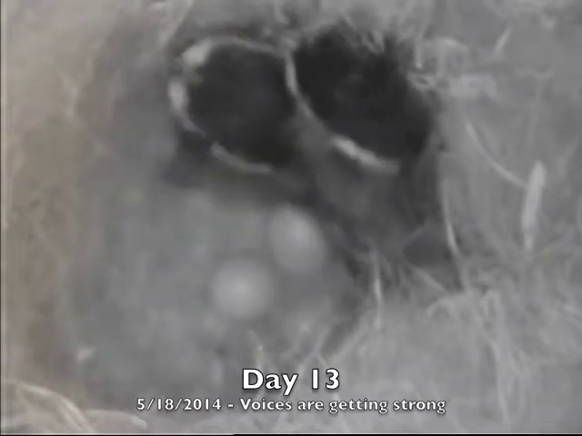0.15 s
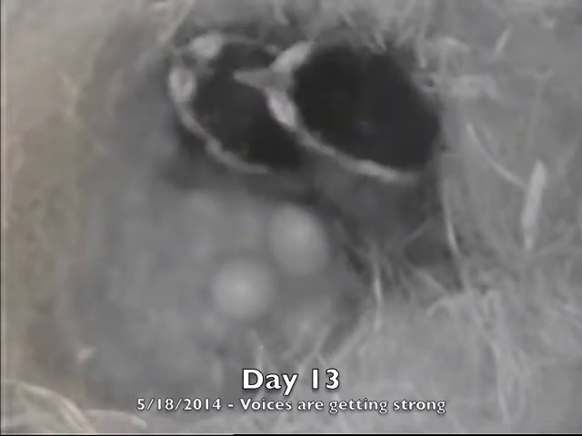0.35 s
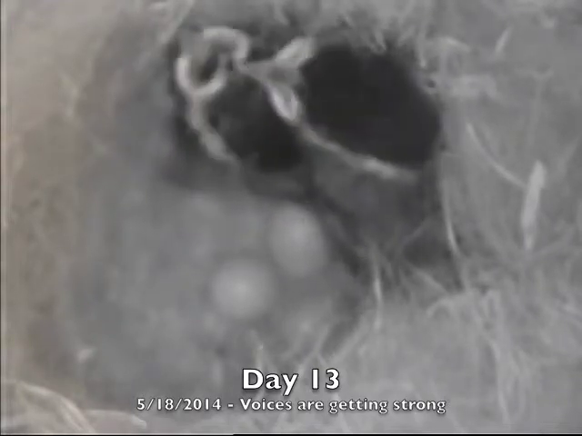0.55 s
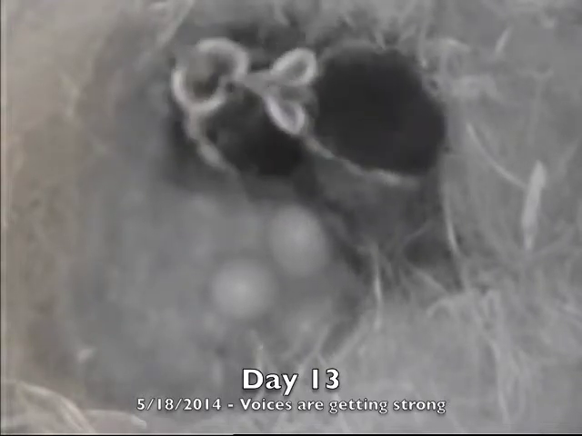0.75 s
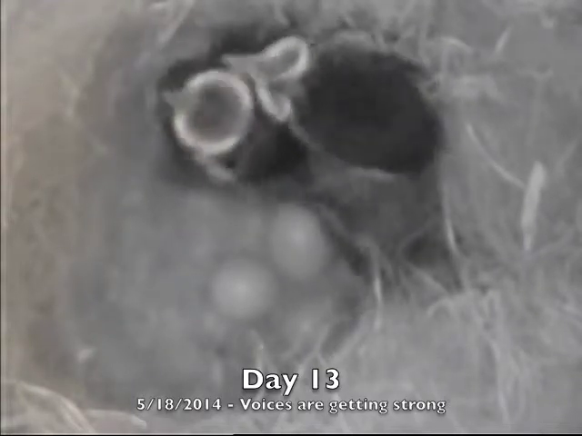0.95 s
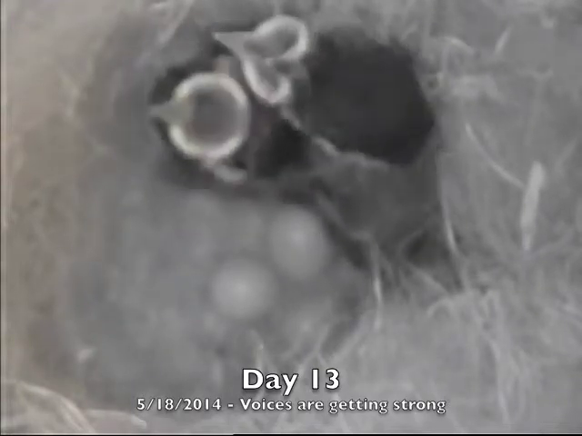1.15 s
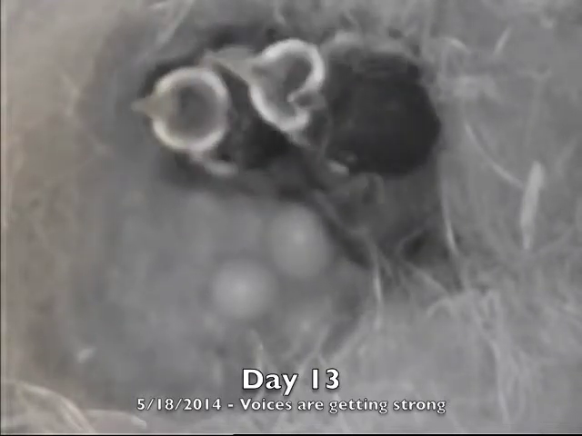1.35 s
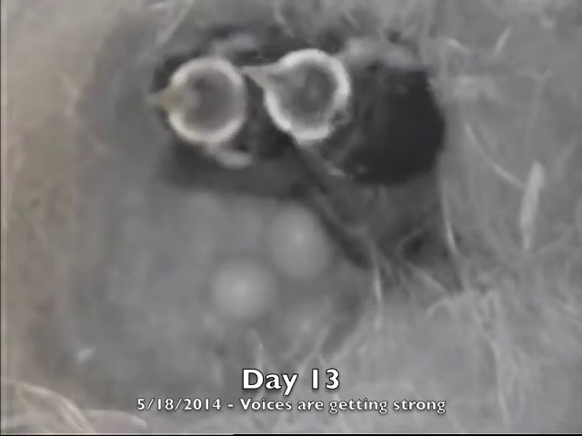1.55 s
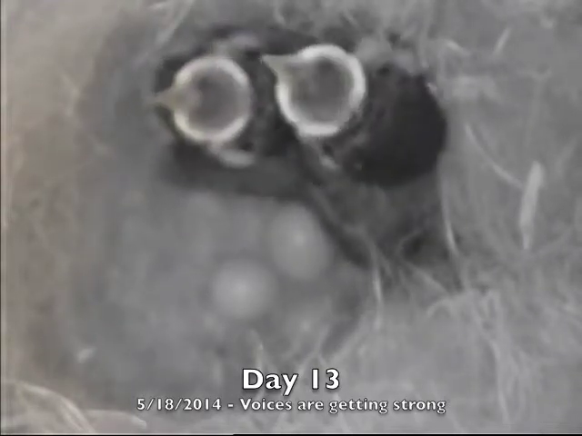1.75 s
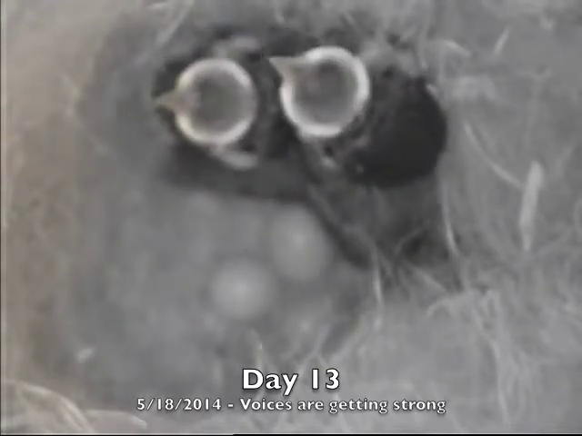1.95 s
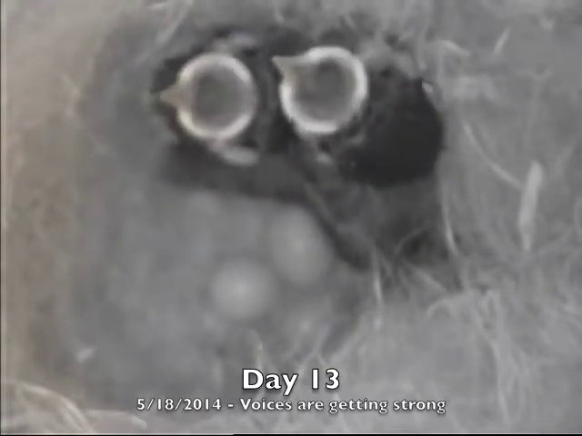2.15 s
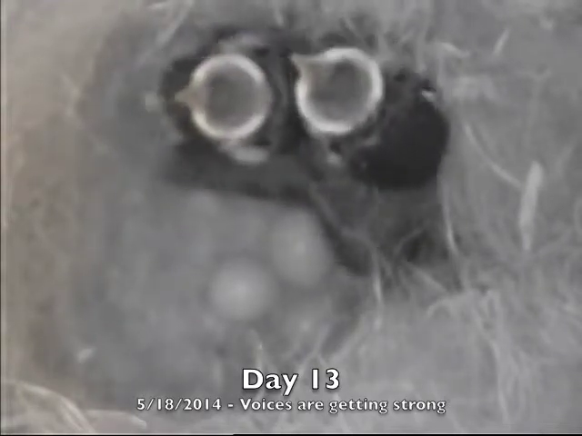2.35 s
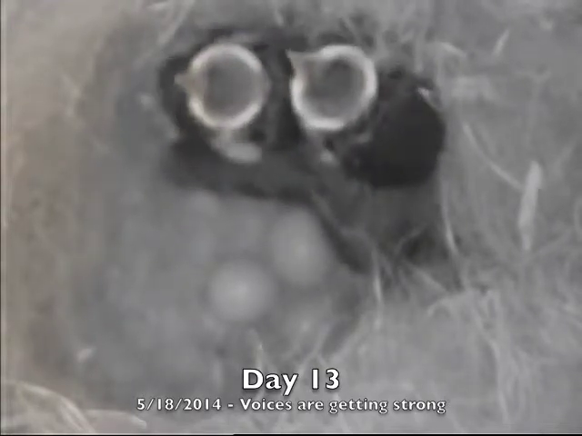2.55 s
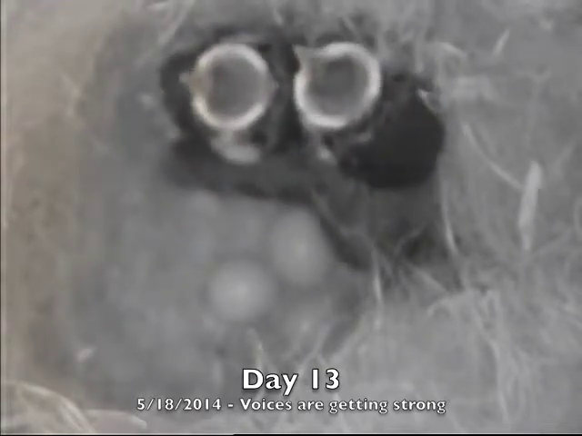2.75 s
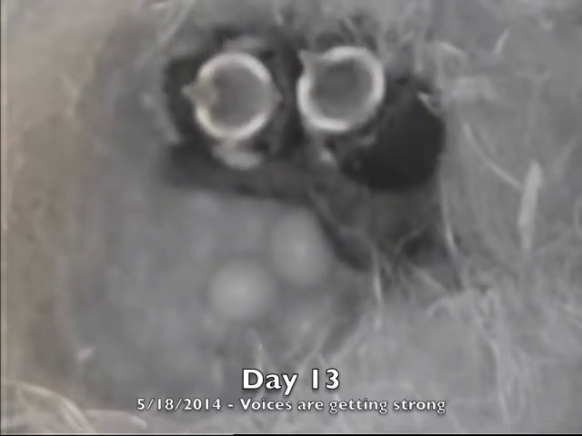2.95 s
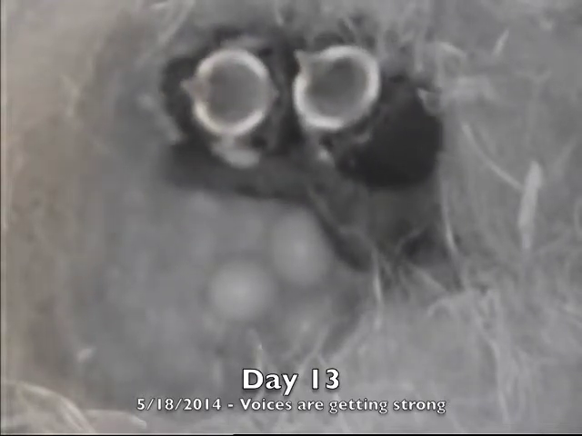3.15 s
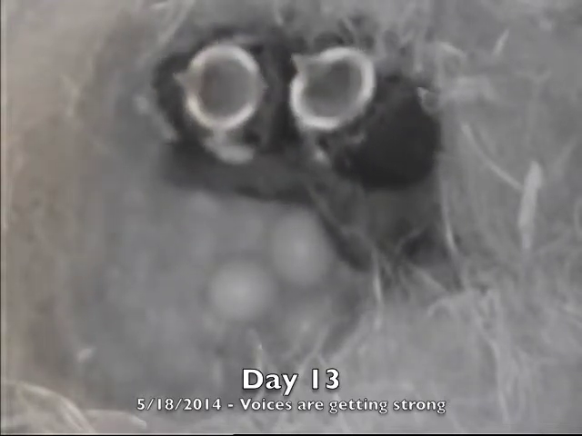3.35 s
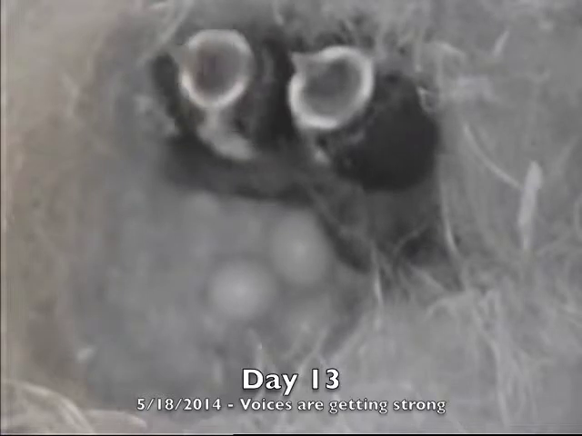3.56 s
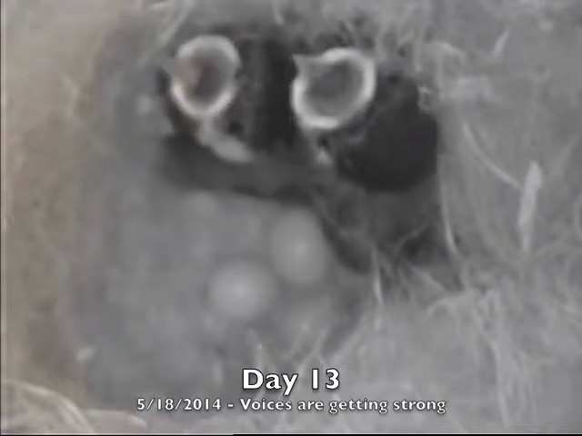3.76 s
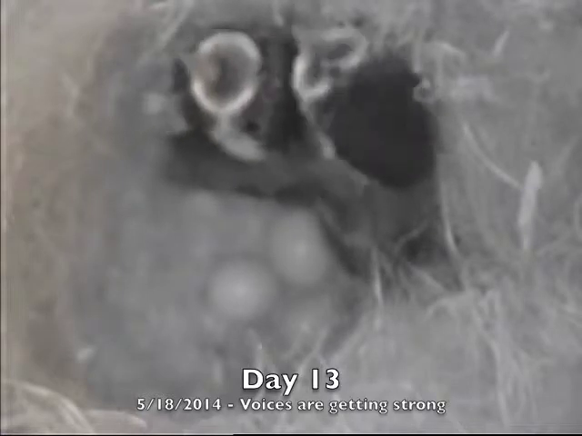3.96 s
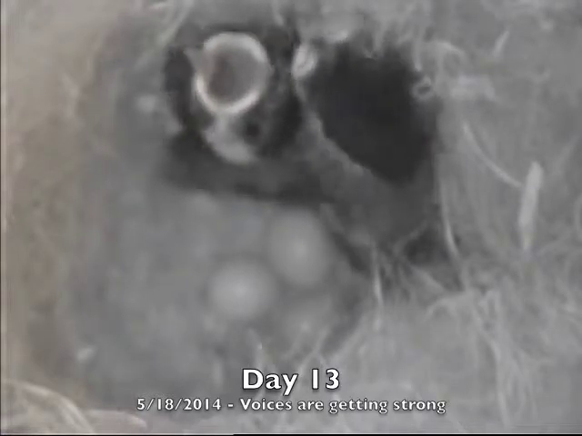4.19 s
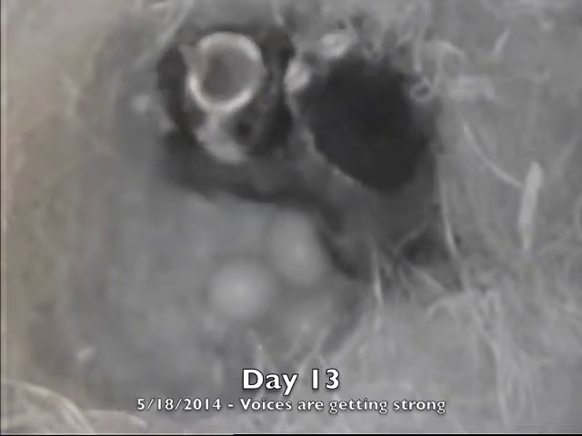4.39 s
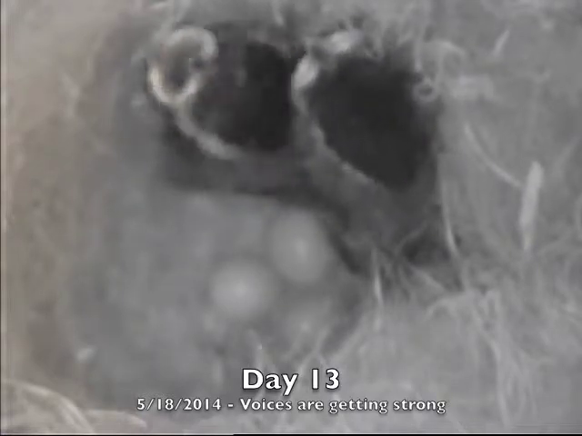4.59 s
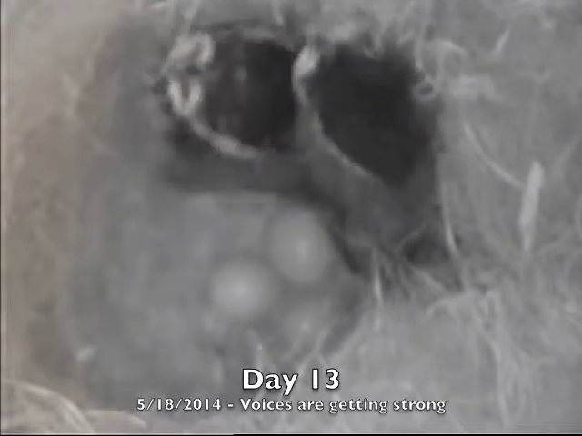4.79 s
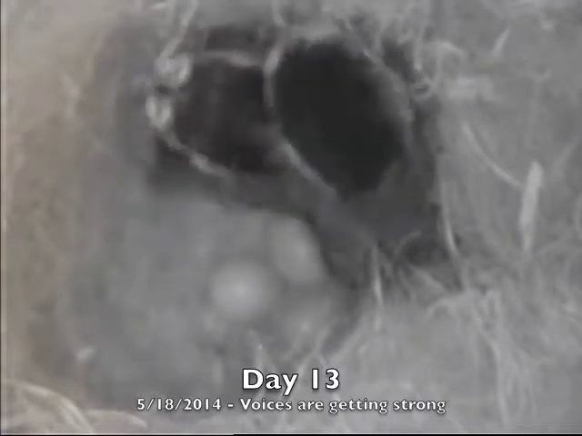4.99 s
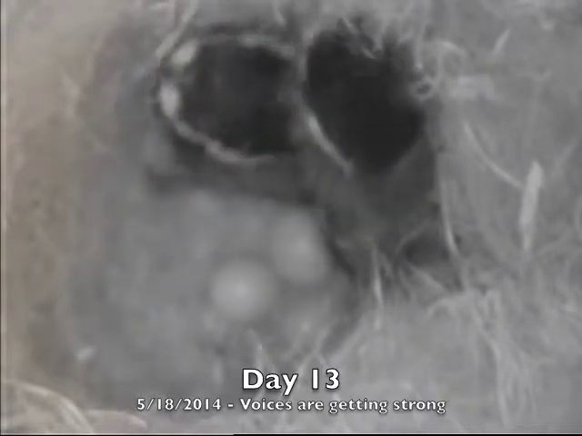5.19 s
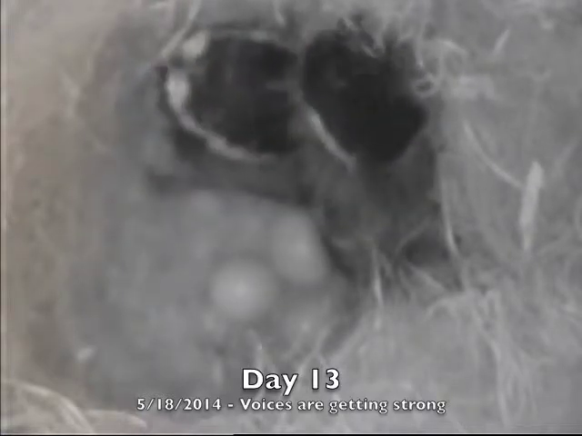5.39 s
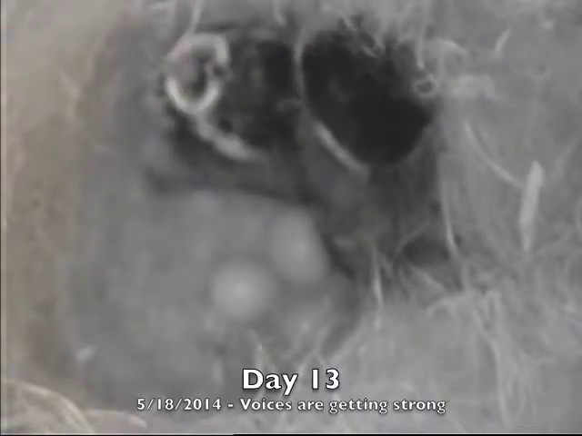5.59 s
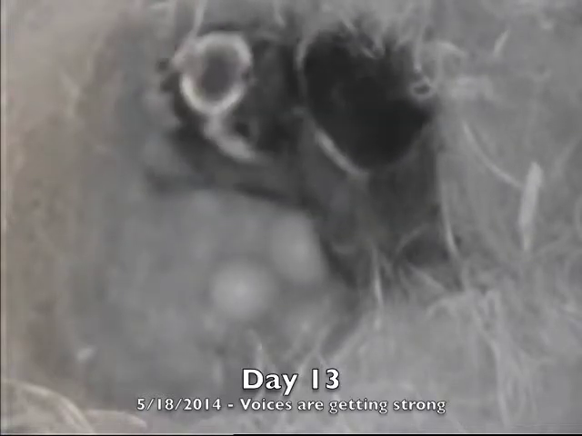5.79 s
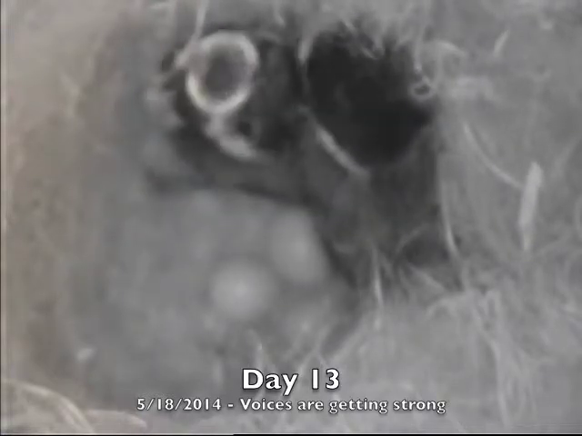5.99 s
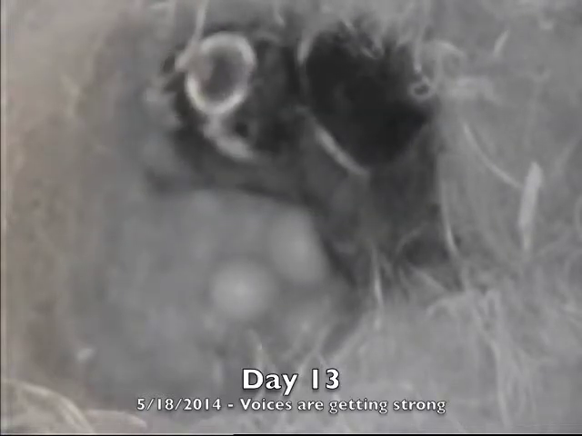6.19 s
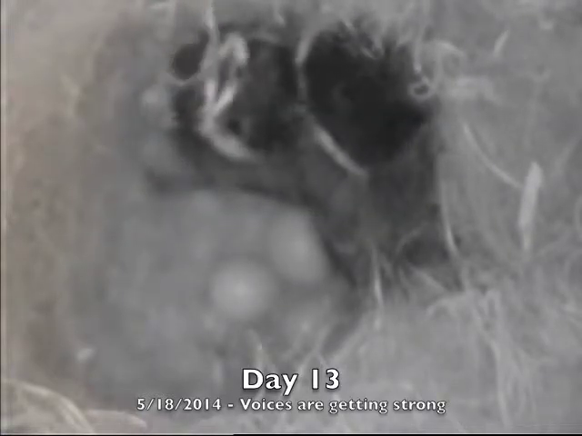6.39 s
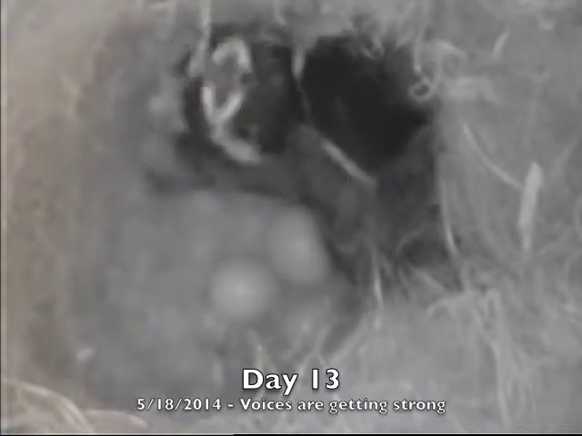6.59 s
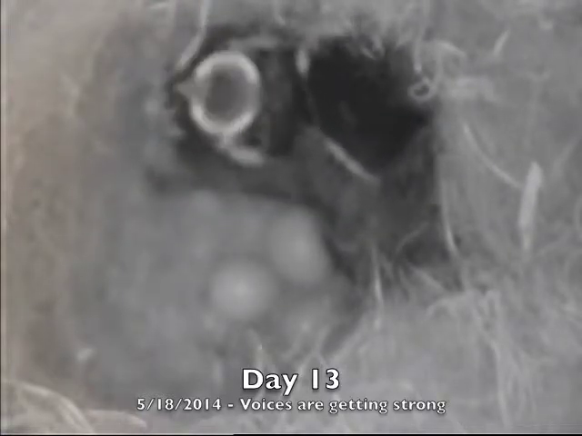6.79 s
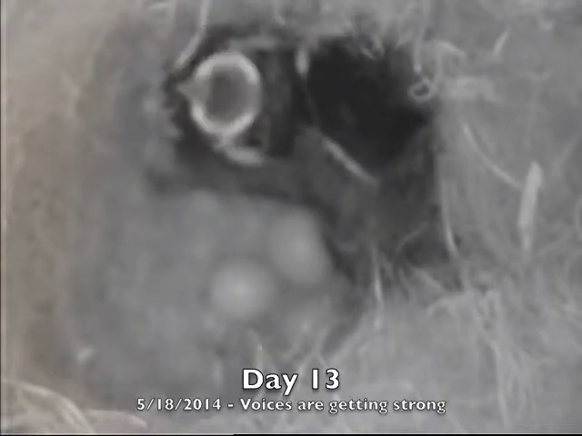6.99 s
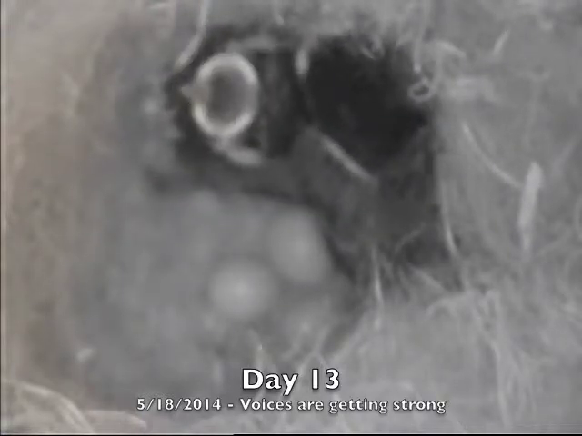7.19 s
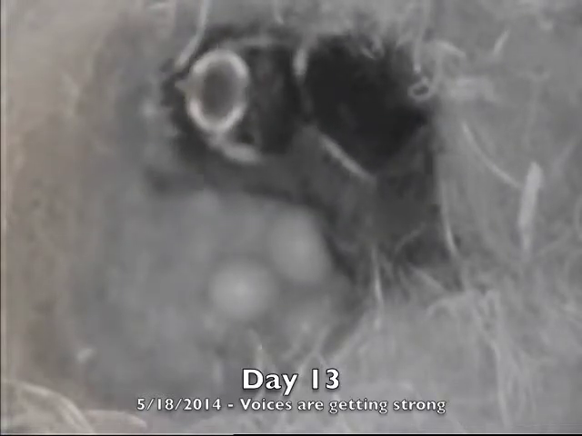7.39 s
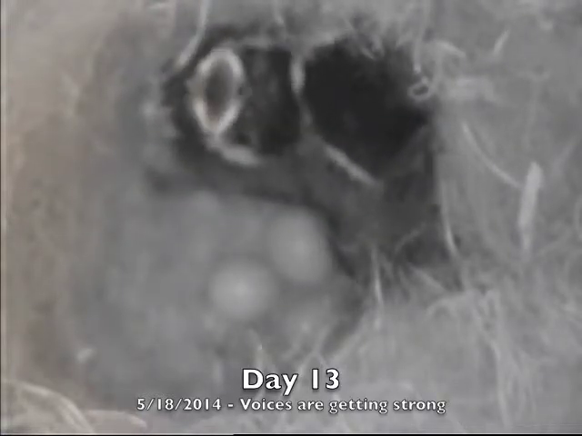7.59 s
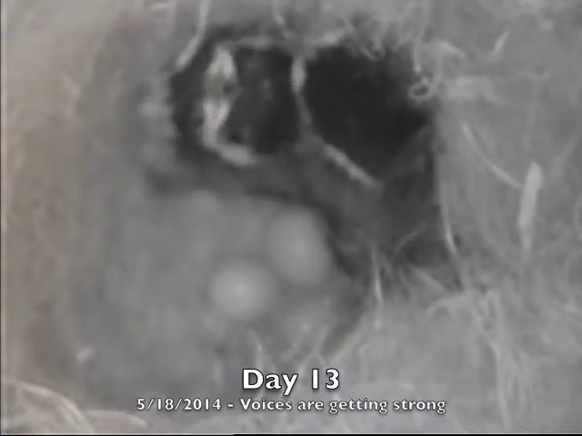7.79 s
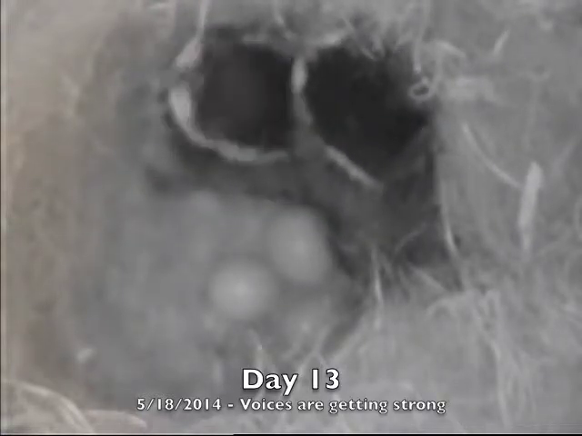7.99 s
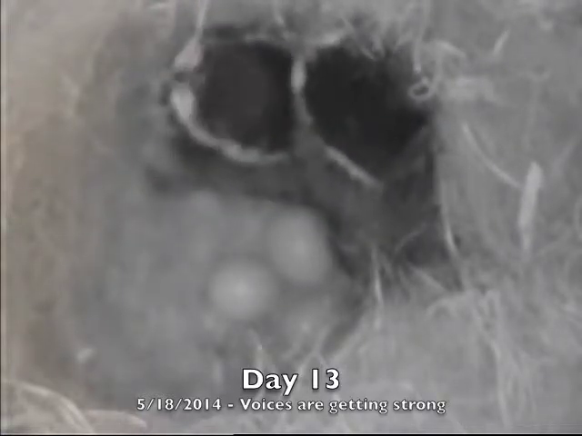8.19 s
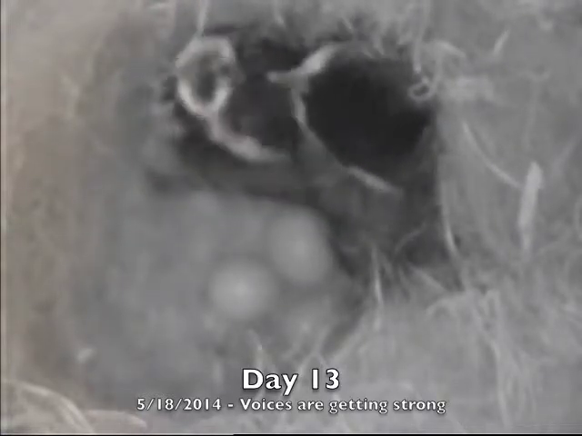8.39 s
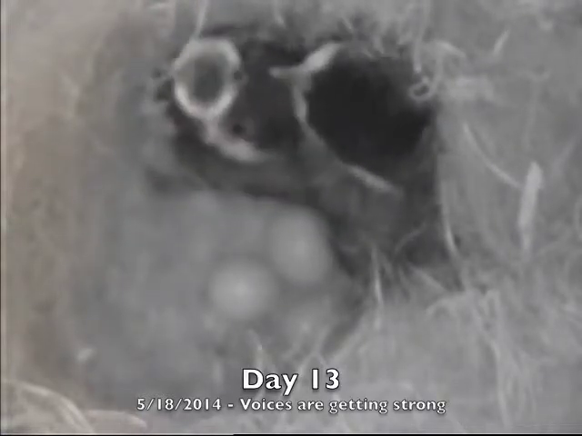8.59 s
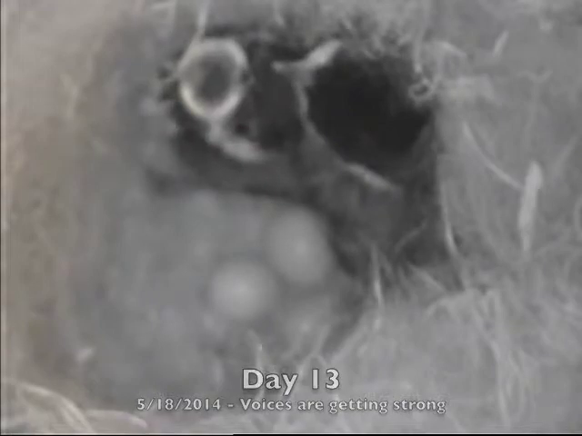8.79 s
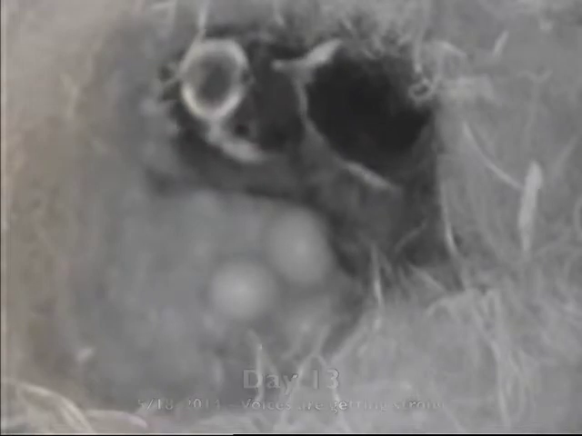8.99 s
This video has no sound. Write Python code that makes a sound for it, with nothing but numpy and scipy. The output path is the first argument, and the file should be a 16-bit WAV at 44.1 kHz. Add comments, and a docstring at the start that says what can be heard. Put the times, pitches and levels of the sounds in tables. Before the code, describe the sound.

Rapid begging calls of nestlings, thin, squeaky and scratchy, fill a cramped wooden box. Bright arched whistles crack and fray into buzzing rasps, some overlapping, with a few short wobbling notes. The calling runs irregularly from beginning to end, loosening after the middle, while quiet electronic hum, hiss and gusty low air noise continue behind. The small microphone sounds close, narrow and slightly ringing.

```python
"""Two nestlings beg inside a wooden nest box, close to a small camera microphone.
From the start, air noise rumbles in the hollow of the box, over electronic hiss, whine and mains-rate buzz.
Almost at once breathy rasps begin, made of patchy noise and wandering, buzzing tones; they recur to the end.
Arched whistles and level notes then join them, each a gliding sine with its octave, torn by random sidebands.
The walls add a short decaying echo; fixed peaks of box and microphone colour voices and buzz."""
import sys
import numpy as np
from scipy import signal
from scipy.fft import rfft, irfft, next_fast_len
from scipy.io import wavfile
from scipy.ndimage import uniform_filter1d

SR = 44100
rng = np.random.default_rng(int(sys.argv[2]) if len(sys.argv) > 2 else 0)


def master(y):
    """Save y as 16-bit WAV."""
    cut = np.clip(np.atleast_2d(y).T, -1, 1)
    pcm = np.round(cut * 32767)  # scale
    wavfile.write(sys.argv[1], SR, pcm.astype(np.int16))


N = 399093

# gain of the air noise in the hollow, joined by straight lines: time_s, gain_db
RUMBLE_GAINS = [(0.0, -67.5), (1.16, -54), (1.84, -65), (2.47, -54.5), (2.62, -62.5), (3.15, -58.5),
                (3.5, -65.5), (4.1, -65), (4.76, -71.5), (5.67, -63.5), (5.739, -52), (6.18, -63.5),
                (6.299, -56), (7.111, -62.5), (7.18, -49.5), (7.28, -64.5), (7.609, -53), (8.04, -74),
                (8.971, -68)]
HOLLOW_HZ, HOLLOW_WIDTH_HZ = 227.3, 57.2  # resonance of the hollow; width of each of its two passes

# thin lines of the electronics: pitch_hz, level_db (rms before the throb)
WHINE_LINES = [(925.9, -85.5), (1900, -87), (3957, -78.5), (7854, -79)]
# spectral shape of the amplifier hiss, before scaling to its level: frequency_hz, relative_gain_db
HISS_SHAPE = [(20, -5), (40, -15.5), (160, -15), (290, -24.5), (400, -36), (600, -37.5), (900, -25),
              (1200, -43.5), (2300, -50.5), (9200, -56.5)]
HISS_DB = -75.5
MAINS_HZ = 59.94
BUZZ_DB, BUZZ_SHARPNESS = -73, 0.39  # level before the box colours it; how peaked each cycle is

# one row per rasp, levels as rms of full-band breath before box and echo:
# start_s, length_s, chest_db, throat_db, mouth_db, gape_db, beak_db
RASP_CALLS = [(0.041, 0.26, -42, -43.5, -49.5, -74, -69), (0.404, 0.1, -43, -52, -39.5, -20.5, -53),
              (0.49, 0.17, -37, -37.5, -36.5, -24, -30.5), (0.6, 0.15, -39.5, -40.5, -41, -24, -20.5),
              (0.816, 0.27, -34.5, -39, -39, -19, -18), (1.169, 0.23, -31, -37, -37.5, -34, -26.5),
              (1.398, 0.048, -39, -41, -34, -34, -24.5), (1.648, 0.17, -47.5, -46, -44.5, -29, -37),
              (1.811, 0.38, -37, -52, -45.5, -33, -32.5), (2.172, 0.23, -35.5, -53, -38, -35, -31.5),
              (2.463, 0.17, -37.5, -42, -35, -44, -23.5), (2.643, 0.083, -36.5, -42, -37, -33, -28.5),
              (2.701, 0.15, -28, -28.5, -34, -51, -23.5), (2.948, 0.15, -38.5, -47, -36.5, -43, -35),
              (3.09, 0.2, -31.5, -46.5, -42, -37, -32), (3.392, 0.11, -41, -61, -54, -32.5, -24.5),
              (3.587, 0.03, -31.5, -40.5, -44, -27, -25.5), (3.662, 0.16, -36, -51, -32.5, -38.5, -28),
              (3.934, 0.026, -38.5, -38, -27.5, -39, -33), (3.981, 0.038, -39.5, -40, -30, -30, -17),
              (4.079, .122, -46.5, -38, -31.5, -45, -33.5), (4.213, 0.05, -42, -44.5, -55, -42.5, -33.5),
              (4.259, 0.17, -31, -33, -29.5, -52, -28.5), (4.544, 0.14, -44, -45.5, -45, -32.5, -26.5),
              (4.736, 0.08, -35.5, -49, -47, -66, -42), (4.923, 0.2, -36.5, -54.5, -39.5, -39.5, -45.5),
              (5.377, 0.17, -41.5, -46, -46, -74, -79), (5.548, 0.072, -30, -44, -43, -39, -29),
              (5.583, 0.12, -46, -39.5, -62.5, -72, -74), (5.739, 0.174, -37, -44, -44.5, -21, -20),
              (5.881, 0.19, -43.5, -44.5, -38, -69, -63.5), (5.997, 0.17, -39.5, -49.5, -45, -26, -21.5),
              (6.578, 0.1, -45, -47, -38, -83, -89), (6.787, 0.2, -33.5, -48.5, -43, -41, -27),
              (7.007, 0.081, -44, -36.5, -34, -75, -70), (7.091, .16, -35, -44, -35, -25, -22.5),
              (7.347, 0.13, -38, -53.5, -46.5, -22, -23.5), (7.568, 0.16, -37.5, -52, -44, -28.5, -29),
              (7.913, 0.096, -39.5, -55, -42.5, -63, -63.5), (8.186, 0.096, -44, -58, -56.5, -73.5, -74.5),
              (8.355, 0.058, -40.5, -55, -34.5, -71, -77), (8.408, 0.15, -37, -46, -38.5, -24.5, -19),
              (8.592, 0.042, -36, -42, -34, -60, -52), (8.643, 0.19, -36.5, -41.5, -36, -18, -17.5),
              (8.954, 0.18, -38, -49.5, -49.5, -25, -20)]
# borders between those five parts of the spectrum: frequency_hz
PART_EDGES_HZ = [500, 2100, 4500, 6700, 7750, 9050]
# around these a wandering, buzzing tone runs through each rasp, one per part: pitch_hz
STRAND_PITCHES_HZ = [1420, 2830, 5350, 7300, 8200]
FLAP_PER_S = 280  # mean rate at which the strands buzz

# one row per arched whistle, basic levels before the voice's own pitch effects, box and echo:
# start_s, rise_s, hold_s, fall_s, start_hz, top_hz, end_hz,
# fundamental_start_db, fundamental_top_db, octave_start_db, octave_top_db, octave_end_db
ARCHED_WHISTLES = [(0.059, 0.049, 0.035, 0.045, 2506, 3545, 2400, -39, -36.5, -33, -104, -33.5),
                   (0.401, 0.051, 0.021, 0.053, 3310, 4160, 4280, -55, -30.5, -51, -43, -49),
                   (0.829, 0.051, 0.062, 0.008, 2910, 3350, 3300, -49, -35, -43, -38, -44),
                   (0.935, 0.0029, 0.0031, 0.011, 3300, 3330, 2780, -22, -31, -44, -34, -37),
                   (1.048, 0.077, 0.011, 0.0081, 2890, 4233, 3170, -31.5, -23, -29.5, -22, -39.5),
                   (1.209, 0.065, 0.044, 0.0062, 2510, 4010, 3270, -30, -34.5, -31.5, -33, -35),
                   (1.41, 0.05, 0.046, 0.039, 2590, 3705, 2625, -28.5, -30.5, -25, -32.5, -26.5),
                   (1.67, 0.075, 0.0062, 0.0056, 2970, 3580, 3185, -41, -39.5, -37.5, -35.5, -50),
                   (1.762, 0.012, 0.03, 0.018, 3210, 3028, 2420, -31.5, -53.5, -45, -36.5, -43.5),
                   (1.961, 0.064, 0.013, 0.068, 2814, 3530, 2350, -43, -42.5, -41.5, -34, -46.5),
                   (2.204, 0.063, 0.018, 0.026, 3880, 4175, 4050, -48, -64, -32, -26, -39.5),
                   (2.241, 0.037, 0.051, 0.055, 2870, 3640, 2464, -42, -42, -44, -49, -42),
                   (2.397, 0.065, 0.0038, 0.038, 3600, 3880, 3430, -70, -51, -29.5, -26, -31),
                   (2.503, 0.026, 0.023, 0.085, 3080, 3820, 3180, -39, -40, -33, -39, -45),
                   (2.72, 0.069, 0.02, 0.019, 2680, 4130, 3840, -35.5, -41, -41.5, -33, -53),
                   (2.971, 0.059, 0.022, 0.031, 2884, 4010, 2440, -42, -35, -44, -35.5, -64),
                   (3.411, 0.025, 0.058, 0.016, 3486, 3810, 2550, -69, -47, -45, -32, -42),
                   (3.61, 0.029, 0.061, 0.004, 3700, 3810, 3700, -62, -55.5, -32, -28.5, -34),
                   (3.942, 0.051, 0.0026, 0.0012, 2690, 3930, 3800, -51, -24, -29, -40, -48),
                   (4.093, 0.062, 0.04, 0.008, 2476, 3966, 3630, -31, -26.5, -16, -84, -61),
                   (4.278, 0.053, 0.043, 0.034, 2520, 3617, 2780, -30.5, -28.5, -20.5, -67, -35),
                   (4.56, 0.061, 0.037, 0.023, 4064, 3883, 3800, -53.5, -44, -37, -30, -40),
                   (4.761, 0.028, 0.045, 0.024, 3605, 3706, 2520, -49.5, -51.5, -32, -27, -34),
                   (4.949, 0.036, 0.063, 0.065, 3310, 3570, 2640, -45.5, -43.5, -46, -41, -50),
                   (5.386, 0.036, 0.0071, 0.0064, 2840, 3660, 3900, -60, -39.5, -66.5, -90.5, -87),
                   (5.394, 0.02, 0.032, 0.028, 3266, 3023, 2430, -45, -59, -50, -49.5, -30.5),
                   (5.594, 0.045, 0.032, 0.015, 2640, 4000, 4200, -30.5, -51, -38, -107, -76),
                   (5.87, 0.048, 0.038, 0.066, 2940, 3340, 2430, -45, -45, -45.5, -99, -43),
                   (6.033, 0.049, 0.016, 0.07, 3500, 3740, 2535, -49, -48.5, -50.5, -37, -49),
                   (6.592, 0.022, 0.0099, 0.0013, 2724, 3860, 3900, -58.5, -39, -39.5, -88, -80),
                   (6.597, 0.013, 0.04, 0.024, 3030, 3155, 2550, -45.5, -68, -41, -45.5, -35),
                   (6.8, 0.051, 0.045, 0.0025, 2840, 4325, 4400, -38.5, -21.5, -42, -73, -57),
                   (7.024, 0.062, 0.014, 0.068, 2770, 3830, 2630, -43.5, -54.5, -55, -80, -41),
                   (7.36, 0.036, 0.017, 0.067, 3500, 3830, 3370, -53, -43, -64, -33, -49),
                   (7.59, 0.017, 0.014, 0.1, 3400, 3760, 3480, -53, -48, -46, -36.5, -44.5),
                   (7.925, 0.021, 0.01, 0.031, 3000, 3230, 3070, -58.5, -53.5, -58.5, -59.5, -57.5),
                   (8.37, 0.029, 0.022, 0.038, 3230, 3755, 2640, -58, -37, -70, -72, -47.5),
                   (8.611, 0.028, 0.022, 0.044, 2710, 3990, 2580, -44.5, -40, -43, -53.5, -45.5)]
# notes that wobble instead of arching, levels likewise:
# start_s, length_s, pitch_hz, fundamental_db, octave_db
WOBBLING_NOTES = [(0.504, .15, 2840, -48.5, -47), (.662, 0.025, 4098, -68, -27.5),
                  (2.545, .035, 2460, -79, -46), (2.765, 0.08, 2460, -78, -36.5),
                  (3.017, 0.074, 2432, -81, -29), (3.683, 0.13, 2650, -48.5, -56),
                  (3.976, .04, 2430, -64, -28.5), (4.13, 0.056, 2475, -73.5, -27.5),
                  (4.311, 0.041, 2377, -66.5, -21.5), (5.674, 0.026, 2750, -65.5, -44),
                  (7.993, 0.044, 2770, -47, -45.5)]
NOTE_EDGE_S = .006
EASE = 1.3  # power of time by which the pitch eases into and out of its top
CLIMB_PER_S = 0.3  # share by which the held pitch still climbs
WOBBLE_PER_S, WOBBLE_DEPTH_HZ, WOBBLE_ABOVE_HZ = 19, 101.1, 3200  # calls that start and end above this wobble
SPENT_DB = -3.5  # the fundamental ends a little weaker than it starts
LOW_PITCH_HZ, LOW_PITCH_DB_PER_KHZ = 3016, 19  # below this pitch the fundamental gets louder as it sinks
OCTAVE_LIFT_HZ, OCTAVE_LIFT_WIDTH_HZ, OCTAVE_LIFT_DB = 7100, 372, 15  # octaves sound louder around this pitch
SLACK_HZ, TEAR_PER_KHZ, TEAR_ON_RISE = 3200, .5, .45  # slack, low or rising membranes tear
BREAK_DB = 17.5  # drop-out depth per unit of hoarseness and of the random break level

ECHO_DB, ECHO_T60_S = -19, 0.24
# colour of box and microphone together: frequency_hz, gain_db
BOX_COLOUR = [(600, -50.5), (830, -7), (1130, -23.5), (1460, -13.5), (2100, -31.5), (2800, -15.5),
              (3900, -13.5), (4500, -27.5), (5200, -6.5), (5700, -13), (6170, 3), (6750, -31.5), (8270, -5),
              (9100, -38.5)]
# narrow peaks and a notch of the microphone: centre_hz, width_hz, gain_db
MICROPHONE_RINGS = [(8277, 190, 4.5), (6143, 91, 5.5), (4383, 200, -11.5)]
TOP_HZ = 9650  # upper limit of the recorder


def undb(db):
    """Logarithmic measure: decibels become an amplitude ratio."""
    return 10 ** (np.asarray(db) / 20)


def unit(x):
    """Normalisation by mean power: scale to rms 1."""
    return x / np.sqrt(np.mean(x ** 2))


def walk(rate):
    """Band-limited random modulation: levels held 1 / rate s, slewed twice, with rms 1."""
    k = int(SR / np.clip(rate, 1, 1200))
    held = np.repeat(rng.standard_normal(size=12000)[:N // k + 1], k)[:N]
    return unit(uniform_filter1d(uniform_filter1d(held, k), k))


def response(points, rings=(), size=2048):
    """Minimum phase: the folded cepstrum turns a gain curve with narrow peaks into a causal impulse response."""
    curve_hz, curve_db = np.transpose(points)
    bins = np.fft.rfftfreq(size, 1 / SR)
    db = np.interp(np.log(bins + 1), np.log(curve_hz), curve_db)
    for centre_hz, width_hz, peak_db in rings:
        db += peak_db / (1 + ((bins - centre_hz) / width_hz) ** 2)
    cepstrum = irfft(db * np.log(10) / 20)
    cepstrum[1:size // 2] *= 2
    cepstrum[size // 2 + 1:] = 0
    return irfft(np.exp(rfft(cepstrum)))


def convolve(x, h):
    """Linear superposition: each sample of x launches the impulse response h."""
    return signal.fftconvolve(x, h)[:N]


def gate(length, rise_s, fall_s):
    """Gradual onset and release: a squared-sine envelope of this many samples."""
    s = np.arange(length) / SR
    nearest_edge = np.minimum(s / rise_s, s[::-1] / fall_s)
    return np.sin(np.pi / 2 * np.clip(nearest_edge, 0, 1)) ** 2


def rumble():
    """Cavity resonance: gusty air noise rings the hollow of the box, with a weaker skirt below it."""
    s, db = np.transpose(RUMBLE_GAINS)
    air = rng.standard_normal(N) * undb(3.8 * walk(25))
    ring = signal.iirpeak(HOLLOW_HZ, HOLLOW_HZ / HOLLOW_WIDTH_HZ, fs=SR)
    ringing = signal.lfilter(*ring, signal.lfilter(*ring, air))
    skirt = signal.sosfilt(signal.butter(2, [125, 225], "bandpass", fs=SR, output="sos"), air)
    hollow = unit(ringing) + undb(-8) * unit(skirt)
    hollow = signal.sosfilt(signal.butter(3, 300, fs=SR, output="sos"), hollow)
    return hollow * undb(np.interp(np.arange(N) / SR, s, db))


def electronics():
    """Amplitude and phase modulation: thin lines throb at the mains rate and waver, over amplifier hiss."""
    t = np.arange(N) / SR
    throb = (1 + .4 * np.cos(2 * np.pi * MAINS_HZ * t)) * undb(2.2 * walk(40))
    lines = sum(undb(db) * np.sin(2 * np.pi * hz * t + 1.3 * walk(66)) for hz, db in WHINE_LINES)
    hiss = unit(convolve(rng.standard_normal(N), response(HISS_SHAPE, size=8192)))
    return np.sqrt(2) * lines * throb + undb(HISS_DB) * hiss


def buzz():
    """Periodic amplitude modulation: dull noise pulses once a mains cycle."""
    cycle = np.cos(2 * np.pi * MAINS_HZ * np.arange(N) / SR)
    dull = signal.lfilter(*signal.butter(2, 3000, fs=SR), rng.standard_normal(N))
    return undb(BUZZ_DB + 2 * walk(9.5)) * unit(dull) * unit(np.exp(BUZZ_SHARPNESS * cycle))


def rasp_effort(part):
    """Superposed envelopes: the breath level of one spectral part through all the rasps."""
    effort = np.zeros(N)
    for start, length_s, *db in RASP_CALLS:
        a, b = int((start - .004) * SR), min(int((start + length_s + 0.0024) * SR), N)
        # in long rasps the gape opens slowly, so the upper parts swell late
        opening_s = 0.011 + part * 0.18 * length_s ** 2
        effort[a:b] += undb(db[part]) * gate(b - a, opening_s, 0.011)
    return effort


def buzzing_strand(pitch_hz):
    """Frequency and amplitude modulation: a tone of wandering pitch buzzes with an irregular beat."""
    phase = 2 * np.pi * np.cumsum(pitch_hz * (1 + .025 * walk(30) + .012 * walk(250))) / SR
    beat = np.cos(2 * np.pi * np.cumsum(FLAP_PER_S * (1 + .25 * walk(40))) / SR)
    return np.sin(phase) * unit(undb(4 * walk(60)) * (.6 + beat))


def rasps(puff_db=2.5, patchy_db=6.5, count=8, voiced=.6):
    """Turbulence and irregular vibration: breath past flapping membranes gives puffed, patchy noise and tones."""
    size = next_fast_len(N)
    hz, out = np.fft.rfftfreq(size, 1 / SR), np.zeros(N)
    breath = rfft(rng.standard_normal(N), size)
    for part, (lo, hi) in enumerate(zip(PART_EDGES_HZ, PART_EDGES_HZ[1:])):
        effort = rasp_effort(part)
        strand = buzzing_strand(STRAND_PITCHES_HZ[part])
        out += voiced * strand * effort * np.sqrt(4 * (hi - lo) / SR)  # scaled with the noise band's width
        edges = np.linspace(lo, hi, count + 1)
        for below, above in zip(edges, edges[1:]):
            patch = irfft(breath * ((hz >= below) & (hz < above)), size)[:N]
            out += np.sqrt(1 - voiced ** 2) * patch * effort * unit(undb(patchy_db * walk(30)))
    return out * unit(undb(puff_db * walk(200)))


def arch(t, rise_s, hold_s, fall_s):
    """Glide geometry: distance down the flank, 0 on top to 1 at either end, and whether the fall is to come."""
    before_fall = t < rise_s + hold_s
    away = np.where(before_fall, 1 - t / rise_s, (t - rise_s - hold_s) / fall_s)
    return np.clip(away, 0, 1), before_fall


def whistles(waver=.022, clear_db=-24, hoarse_per_db=.016):
    """Harmonic oscillation: a sine and its octave tear into sidebands when weak, low or on the rise."""
    out, bend = np.zeros(N), waver * walk(260)
    tear = walk(1000) + 1j * walk(1000)
    quiver = .013 * walk(110)  # relative pitch deviation
    breaks = np.clip(walk(110), -.3, None)  # the tone keeps breaking
    notes = [(s, NOTE_EDGE_S, length_s - 2 * NOTE_EDGE_S, NOTE_EDGE_S, hz, hz, hz, db, db, db2, db2, db2)
             for s, length_s, hz, db, db2 in WOBBLING_NOTES]
    for (start, rise_s, hold_s, fall_s, start_hz, top_hz, end_hz,
         onset_db, full_db, start_db, top_db, end_db) in list(ARCHED_WHISTLES) + notes:
        a = max(int((start - .003) * SR), 0)
        b = min(int((start + rise_s + hold_s + fall_s + 0.007) * SR), N)
        t = np.arange(a, b) / SR - start
        away, before_fall = arch(t, rise_s, hold_s, fall_s)

        # pitch: arch, slow climb and wobble
        held_hz = top_hz * (1 + CLIMB_PER_S * np.clip(t - rise_s, 0, hold_s))
        hz = held_hz - (top_hz - np.where(before_fall, start_hz, end_hz)) * away ** EASE
        level = start_hz == top_hz == end_hz
        steady = max(.5 * level, np.clip((min(start_hz, end_hz) - WOBBLE_ABOVE_HZ) / 300, 0, 1))
        hz += steady * WOBBLE_DEPTH_HZ * (np.cos(2 * np.pi * WOBBLE_PER_S * (t - rise_s)) - 1)

        flank = 1 - (1 - away) ** 1.6  # levels change fastest around the top
        first_db = full_db + flank * (onset_db + np.where(before_fall, 0, SPENT_DB) - full_db)
        first_db += LOW_PITCH_DB_PER_KHZ * np.clip(LOW_PITCH_HZ - hz, 0, None) / 1000
        octave_db = top_db + flank * (np.where(before_fall, start_db, end_db) - top_db)
        octave_db += OCTAVE_LIFT_DB / (1 + ((2 * hz - OCTAVE_LIFT_HZ) / OCTAVE_LIFT_WIDTH_HZ) ** 2)

        slack = TEAR_PER_KHZ * np.clip(SLACK_HZ - hz, 0, None) / 1000
        slack *= np.where(before_fall, 1, .3) * (1 - .4 * level)
        slack += TEAR_ON_RISE * before_fall * away * (1 - steady)
        weakness = hoarse_per_db * (clear_db - np.maximum(first_db, octave_db))
        hoarse = np.clip(.25 - .1 * level + slack + weakness, .15, .85)

        swing = np.exp(2j * np.pi * np.cumsum(hz * (1 + hoarse * bend[a:b] + quiver[a:b])) / SR)
        fray = np.sqrt(1 - hoarse ** 2) + hoarse * tear[a:b] / np.sqrt(2)
        tone = np.imag((undb(first_db) * swing + undb(octave_db) * swing ** 2) * fray)
        broken = undb(-BREAK_DB * hoarse * (1 - .5 * level) * breaks[a:b])
        out[a:b] += np.sqrt(2) * tone * broken * gate(b - a, .006, .003)
    return out


def scene():
    """Reverberation and superposition: voices and their wall echo are coloured with the buzz, then backed."""
    voices = rasps() + whistles()
    t = np.arange(SR // 2) / SR
    walls = rng.standard_normal(len(t)) * np.exp(-np.log(1000) * t / ECHO_T60_S)
    voices = voices + undb(ECHO_DB) * convolve(voices, walls / np.sqrt(np.sum(walls ** 2)))
    coloured = convolve(voices + buzz(), response(BOX_COLOUR, MICROPHONE_RINGS))
    return (coloured + rumble() + electronics())[None]


def record(dry):
    """Band limitation: the recorder cuts the top steeply with an elliptic low-pass."""
    return signal.sosfilt(signal.ellip(10, .2, 70, TOP_HZ, fs=SR, output="sos"), dry)


dry = scene()
out = record(dry)
master(out)
```